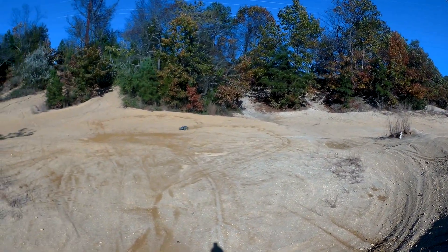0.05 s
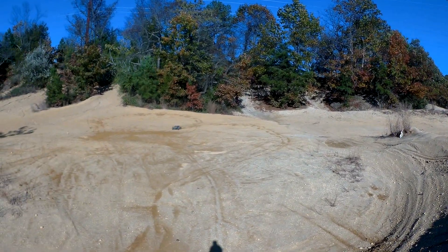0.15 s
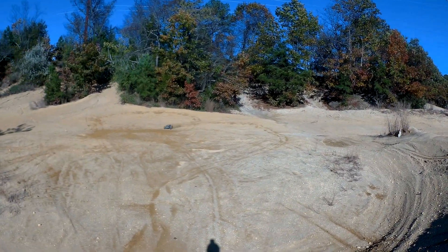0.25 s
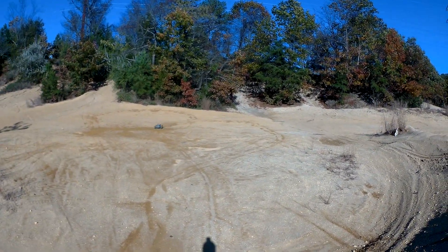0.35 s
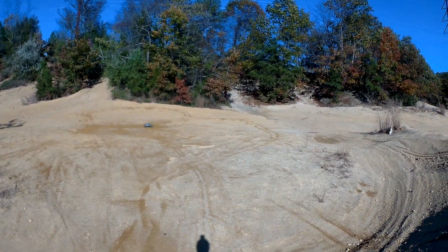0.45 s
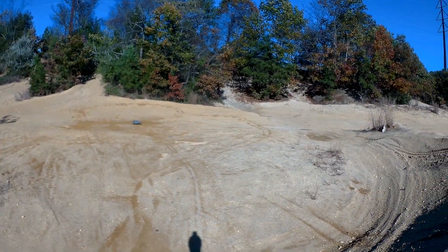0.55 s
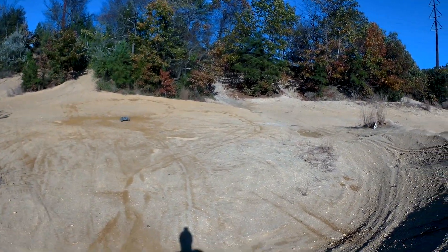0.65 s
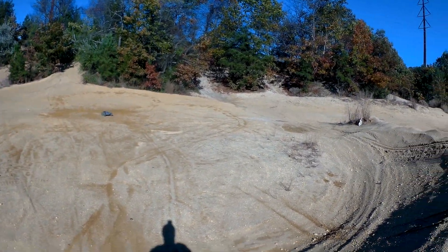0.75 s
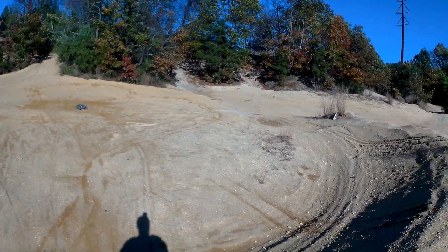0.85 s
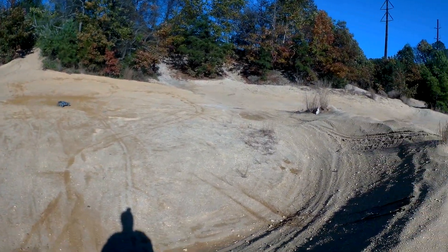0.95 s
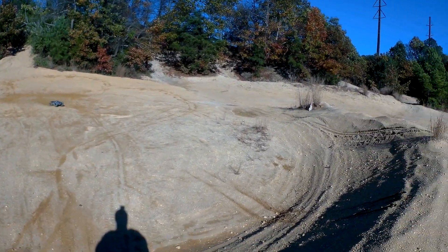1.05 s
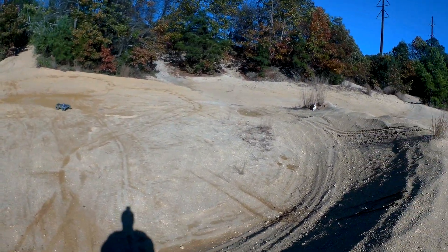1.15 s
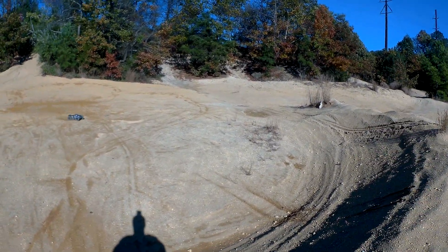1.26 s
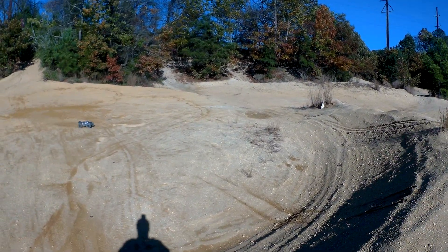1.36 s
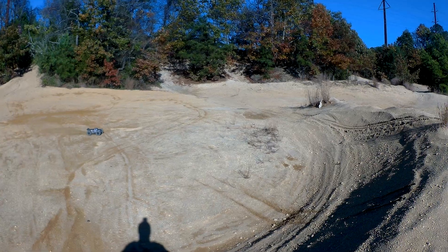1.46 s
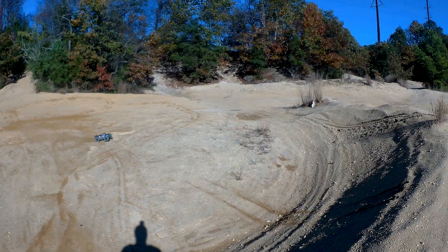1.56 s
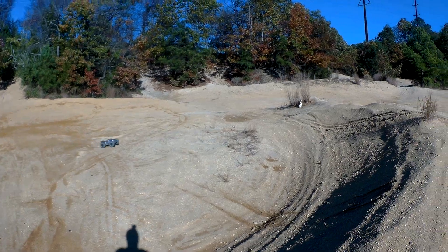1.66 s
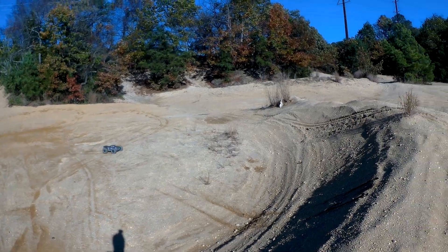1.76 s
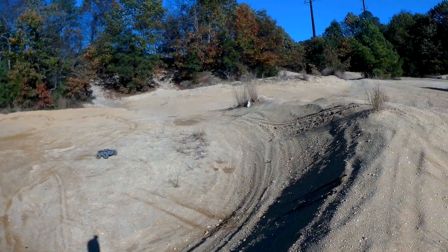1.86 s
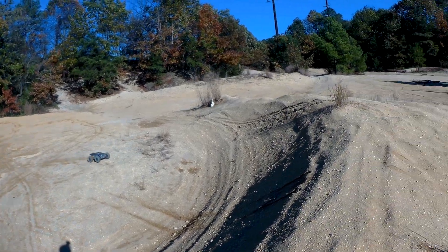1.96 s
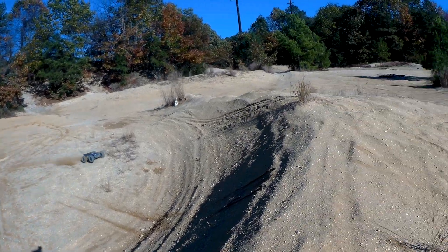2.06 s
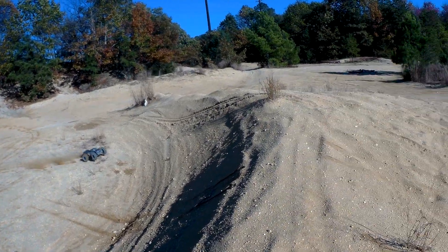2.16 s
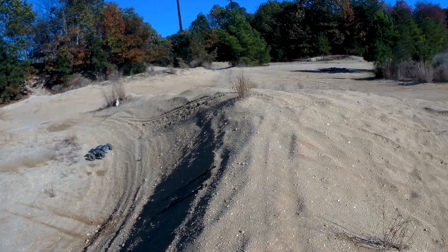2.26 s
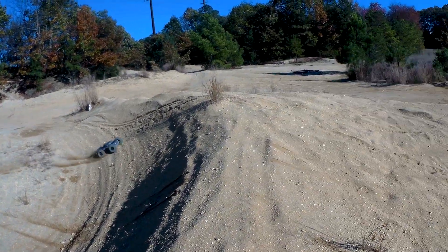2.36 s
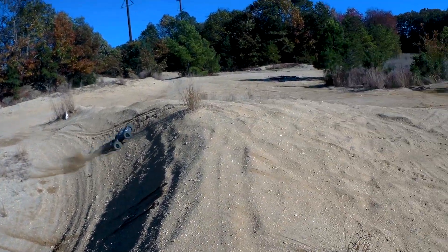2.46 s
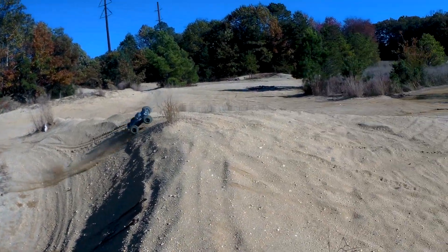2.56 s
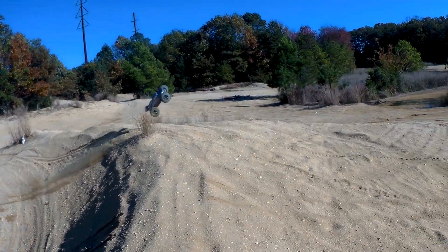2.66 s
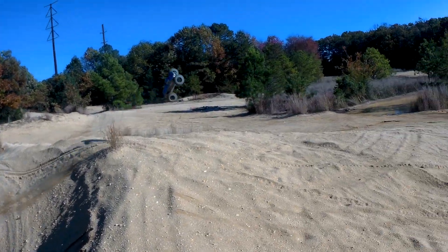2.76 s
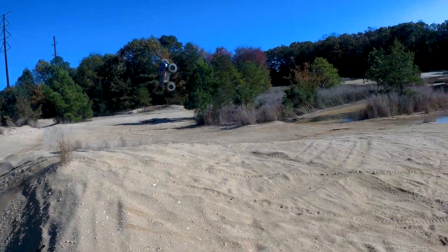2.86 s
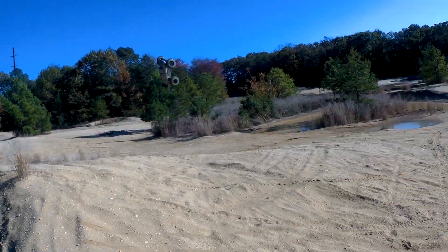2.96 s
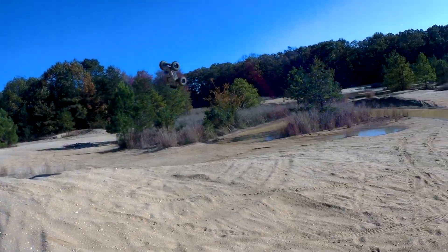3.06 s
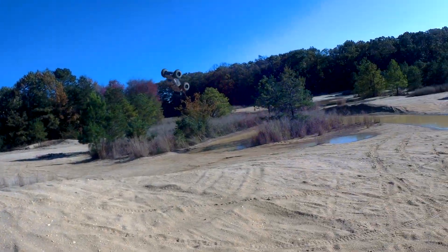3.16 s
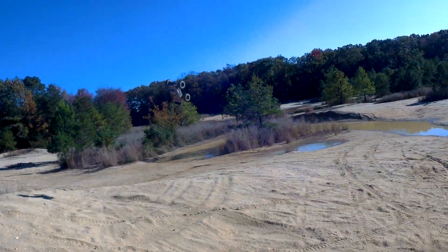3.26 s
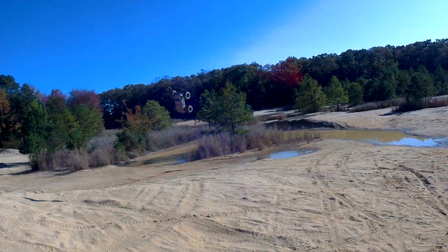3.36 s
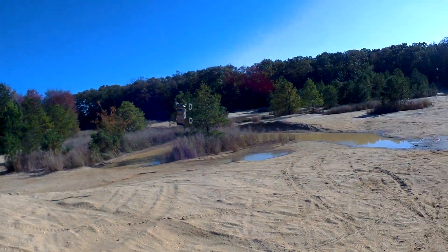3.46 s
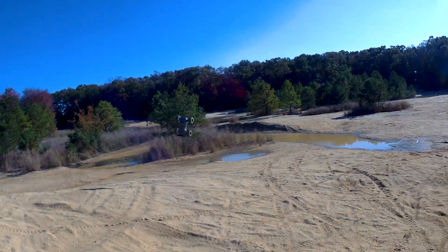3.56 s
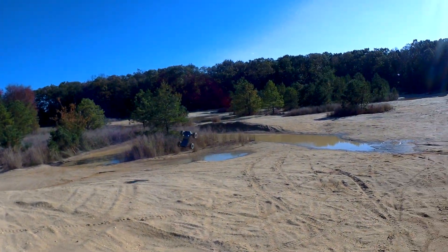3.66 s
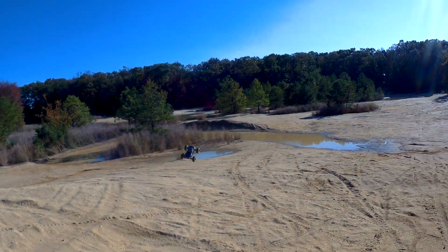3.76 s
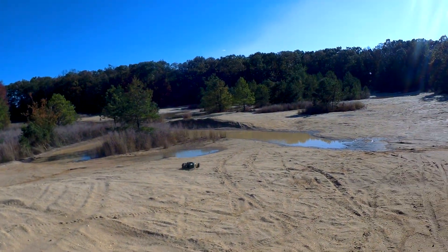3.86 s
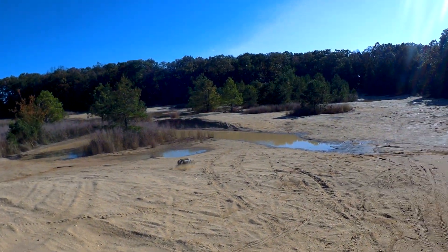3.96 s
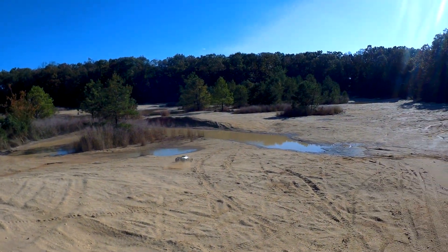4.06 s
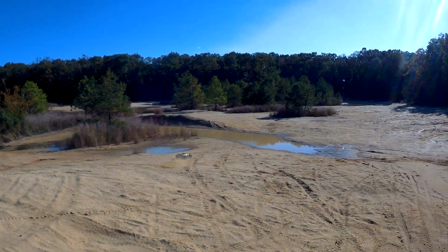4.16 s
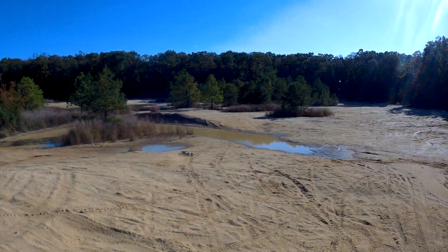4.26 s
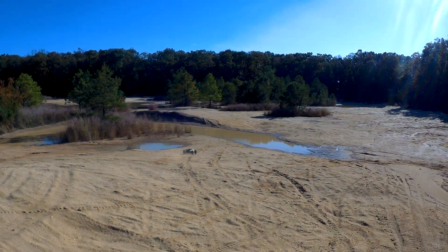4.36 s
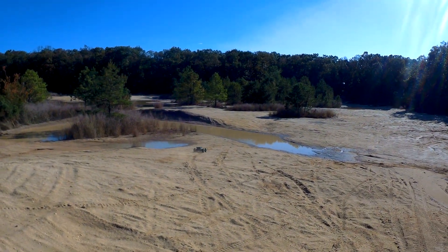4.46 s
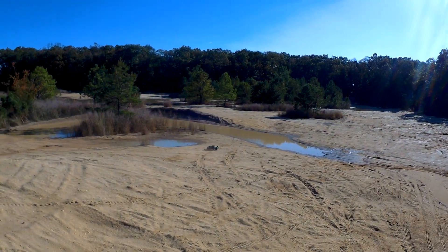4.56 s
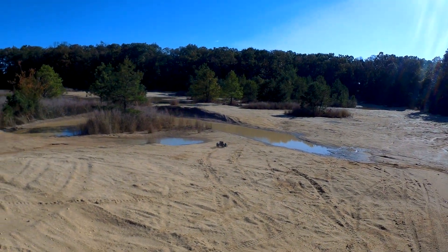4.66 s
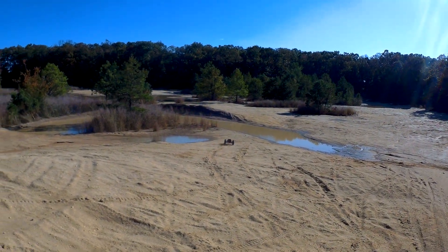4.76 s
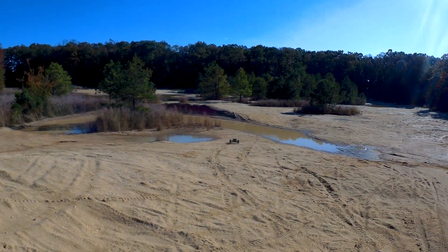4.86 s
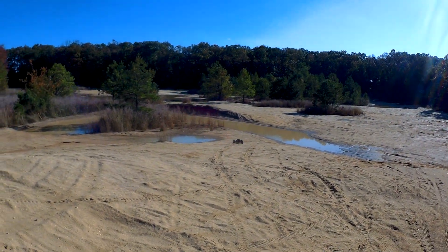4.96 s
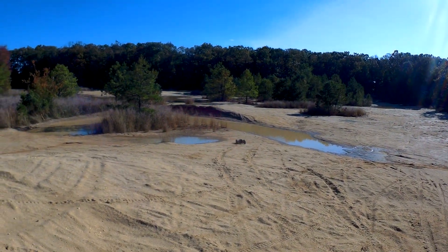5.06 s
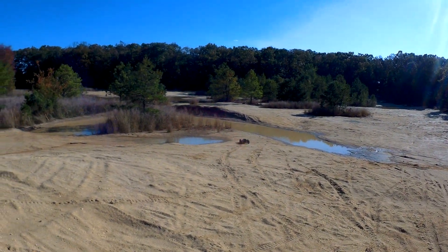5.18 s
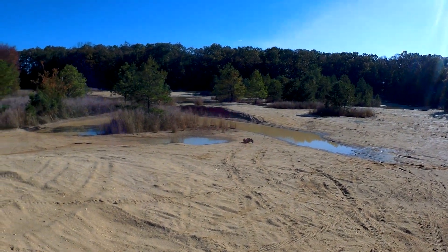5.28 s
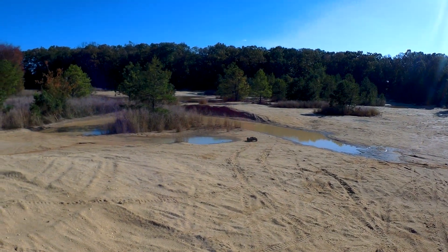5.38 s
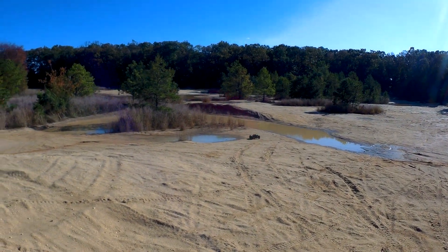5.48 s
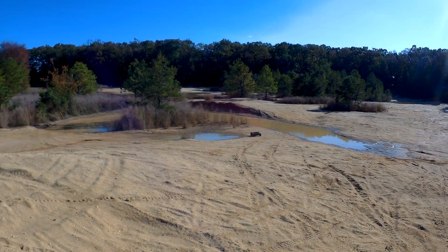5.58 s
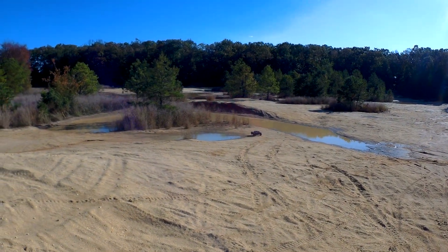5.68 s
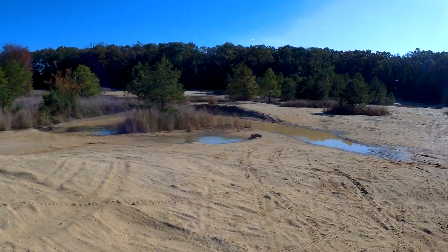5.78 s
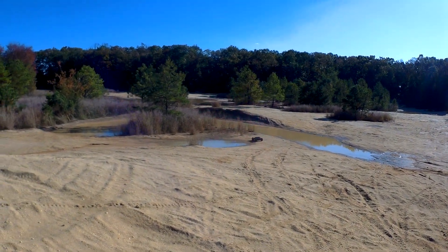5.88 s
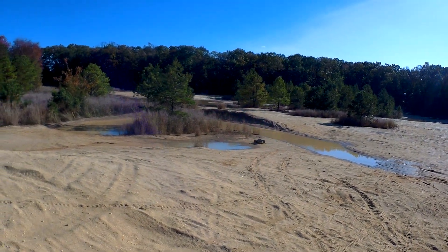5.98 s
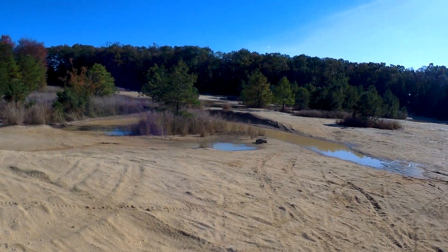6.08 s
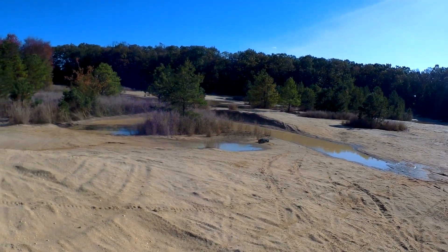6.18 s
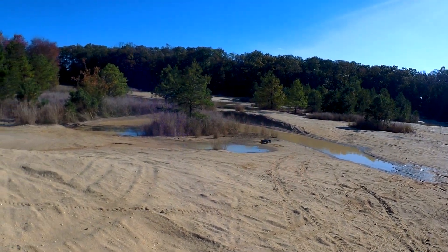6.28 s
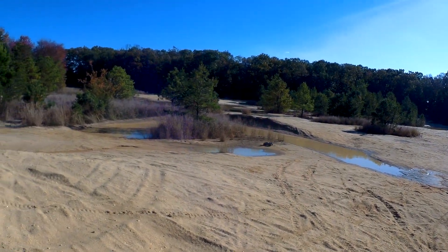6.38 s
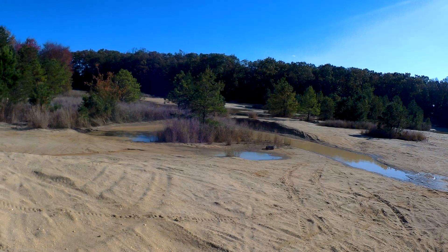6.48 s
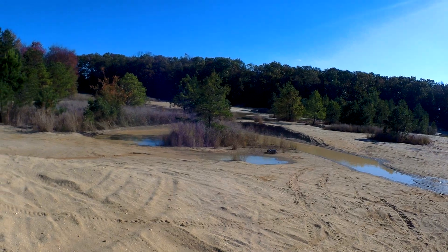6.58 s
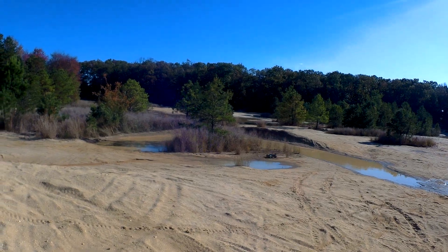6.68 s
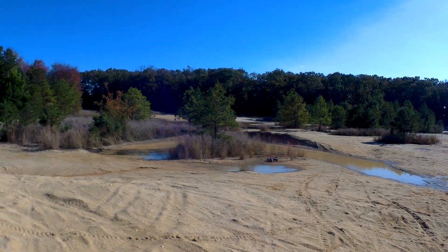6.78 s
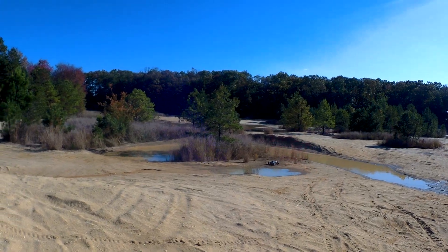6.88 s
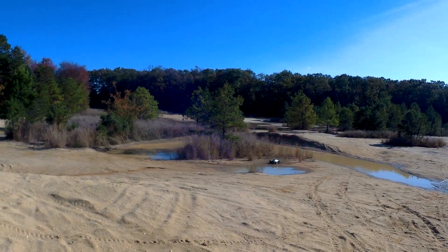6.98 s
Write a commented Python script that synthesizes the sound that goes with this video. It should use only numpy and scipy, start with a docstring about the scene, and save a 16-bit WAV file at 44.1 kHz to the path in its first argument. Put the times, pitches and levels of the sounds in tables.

```python
"""Light wind and steady far air; an electric model truck races over a sand pit toward the microphone.
Geared motor tones whistle, filtered clicks make rasp, shell drone, tyre churn and spray; the wheels howl.
It passes close with a thin sizzle, hits a ramp and flies, its unloaded gears singing out.
Dying modes and a low thump land it; then stabs of throttle bend the gear tones far off.
Two dull bumps of air reach the microphone late; the pit adds a faint echo to the truck."""
import sys
import numpy as np
from scipy import signal
from scipy.fft import rfft, irfft
from scipy.io import wavfile

SR = 44100
rng = np.random.default_rng(int(sys.argv[2]) if len(sys.argv) > 2 else 0)


def inscribe(sig):
    """Save sig as 16-bit PCM at rate SR to the path in sys.argv[1].

    A 1-D sig is mono; a 2-D sig holds one channel per row.
    Samples are clipped to [-1, 1] before scaling.
    """
    pcm = np.round(np.clip(np.atleast_2d(sig).T, -1, 1) * 32767)
    wavfile.write(sys.argv[1], SR, pcm.astype(np.int16))


N = 310010
T = np.arange(N) / SR
# the landing blows come before SETTLED_S, when the driving layers regain their ground balance
PASS_S, TAKEOFF_S, SETTLED_S = 2.15, 2.72, 4.3

# motor speed on the run-up, sagging wherever the sand drags: t/s, mesh rate f/Hz, whistle level/dB
RUN_UP = [(.07, 855, -66), (.24, 1050, -58), (.39, 1030, -52), (.47, 1244, -51), (.56, 1185, -53),
          (.67, 1225, -48.5), (.78, 1276, -49), (.88, 1200, -55), (.94, 1230, -57), (1.0, 1345, -53),
          (1.08, 1350, -53), (1.13, 1335, -56), (1.18, 1375, -53), (1.23, 1402, -52), (1.28, 1360, -58),
          (1.35, 1300, -53), (1.41, 1210, -44), (1.51, 1421, -45.5), (1.59, 1330, -50), (1.68, 1222, -46),
          (1.77, 1446, -53), (1.85, 1400, -51), (1.96, 1435, -47), (2.07, 1390, -53), (2.13, 1500, -54),
          (2.21, 1630, -46), (2.29, 1749, -52), (2.37, 1600, -62), (2.46, 1400, -56), (2.51, 1790, -39),
          (2.56, 2000, -45), (2.61, 1770, -42), (2.68, 2060, -45), (2.8, 1670, -62)]
# wheel howl, rising with road speed and running down in flight; after landing, a weak tone near 1 kHz,
# about half the gear pitch, under the throttle stabs: t/s, pitch f/Hz, level/dB
WHEEL_TONE = [(0, 900, -44), (.3, 960, -37.5), (.6, 930, -43.5), (1.05, 980, -38), (1.35, 1030, -39.5),
              (1.65, 1133, -36), (1.88, 1338, -31.5), (2.07, 1534, -33), (2.28, 1660, -46),
              (2.42, 1500, -46), (2.73, 1850, -44), (2.81, 1740, -35.5), (2.88, 1700, -44),
              (2.94, 1700, -39), (3.0, 1693, -54), (3.2, 1720, -56), (3.28, 1450, -54), (3.41, 1270, -48),
              (3.47, 1210, -44), (3.56, 1175, -43.5), (3.61, 1140, -52), (3.69, 1130, -48),
              (3.95, 900, -52), (4.45, 960, -62), (4.6, 1000, -47), (4.66, 970, -52), (4.76, 1000, -45),
              (4.81, 1160, -47), (4.86, 900, -54), (5.0, 900, -50), (5.07, 1130, -51), (5.2, 1100, -75)]
# nearness of the drive layers, as an equivalent distance (smaller is louder), and how hard the truck is driven
# (each layer scales both): t/s, equivalent distance/m, effort/dB
NEARNESS_AND_EFFORT = [(0, 6, -17), (.12, 8.8, -12.5), (.42, 8.9, -2), (1.1, 12.1, 0.5), (1.4, 9.2, 3),
                       (1.7, 8, -1.5), (1.9, 7, 3), (2.45, 3.55, -2), (2.72, 6.14, 3.5), (3.0, 7, -2.5),
                       (3.5, 7.5, -7), (3.95, 24.4, 3.5), (4.45, 12.8, -12.5), (5.0, 9.7, -15.5),
                       (5.45, 28, -14.5), (5.95, 20.4, -6.5), (6.58, 19, -12), (7.03, 20, -2.5)]
# stabs of throttle: t/s, rise/s, length/s, fade/(dB/s), from f/Hz, to f/Hz, mesh tone level/dB (before a lift),
# second harmonic/dB, third harmonic/dB, gear rasp/dB, shell drone/dB, sand spray/dB
THROTTLE_STABS = [(4.487, .02, 0.1, 15, 1880, 2000, -45, -70, -72, -48, -52, -70),
                  (4.61, 0.032, .05, 12, 2150, 1820, -45, -68, -72, -42, -46, -65),
                  (4.68, 0.016, .16, 22, 1950, 2040, -43.5, -66, -70, -45, -46, -63),
                  (5.098, 0.015, .012, 30, 2330, 2290, -47, -75, -76, -60, -61, -75),
                  (5.345, .006, .012, 160, 1900, 2100, -45, -70, -76, -42.5, -52, -70),
                  (5.683, .016, .1, 55, 1350, 2450, -39, -57, -58, -37, -42, -57),
                  (5.81, 0.014, .1, 70, 2050, 2420, -45, -63, -70, -42, -38.5, -64),
                  (6.12, .017, .125, 58, 1600, 2270, -37, -55.5, -56, -37.5, -43, -56),
                  (6.655, 0.035, 0.13, 28, 1289, 1221, -36, -60, -74, -45, -39, -77),
                  (6.93, 0.039, .11, 8, 1293, 1740, -37.5, -59, -68, -40, -38.5, -63)]


def amp(db):
    """Amplitude factor of a level in dB."""
    return 10 ** (np.asarray(db) / 20)


def unit(x):
    """Scales x to unit power."""
    return x / np.sqrt(np.mean(x ** 2) + 1e-20)


def ramp(start, length):
    """Rises from 0 to 1 and stays there."""
    return np.clip((T - start) / max(length, 1e-3), 0, 1)


def swell(middle, length):
    """A smooth rise and fall that is silent outside its length."""
    return np.cos(np.pi * np.clip((T - middle) / length, -.5, .5)) ** 2


def blend(a, b, share):
    """Mixes two sounds at constant power; b takes the given share."""
    return np.sqrt(1 - share) * a + np.sqrt(share) * b


def follow(rows):
    """Each column of a curve table at every sample."""
    s, *columns = np.transpose(rows)
    return [np.interp(T, s, c) for c in columns]


def colour(x, points):
    """Filters x by a spectrum and brings it to unit power."""
    hz, db = np.transpose(points)
    bins_hz = np.fft.rfftfreq(len(x), 1 / SR)
    gain = amp(np.interp(np.log(bins_hz + 1), np.log(hz), db))
    return unit(irfft(rfft(x) * gain, len(x)))


def wander(rate):
    """Smooth chance of unit size that changes about rate times a second."""
    hz = np.fft.rfftfreq(N, 1 / SR)
    return unit(irfft(rfft(rng.standard_normal(N)) / (1 + (hz / rate) ** 2), N))


def grains(per_s, spread_db):
    """Sparse clicks of uneven size."""
    size = amp(spread_db * np.minimum(rng.exponential(1, N), 4)) * rng.choice([-1, 1], N)
    return unit(size * (rng.random(N) < per_s / SR))


def resonate(x, hz, width):
    """A steep resonance: the same pole pair twice."""
    b, a = signal.iirpeak(hz, hz / width, SR)
    return signal.lfilter(b, a, signal.lfilter(b, a, x))


def stab(start, rise, length, fade_db_per_s):
    """Envelope of a stab of throttle: attack, sagging hold, release."""
    hold = amp(-abs(fade_db_per_s) * np.clip(T - start, 0, 1))
    release = np.exp(-np.clip(T - start - length, 0, 1) / .028)  # time constant in s
    return ramp(start, rise) * hold * release


def mesh_phase(hz, jitter):
    """Bumps and tooth play make the gear speed shiver."""
    return 2 * np.pi * np.cumsum(hz * (1 + jitter * wander(114.3))) / SR


def tooth_force(phase, runout, rough):
    """The tooth load swings once per pinion turn and chatters at random."""
    pinion_teeth = 13
    return unit(1 + runout * np.cos(phase / pinion_teeth) + rough * wander(160))


def gear_chatter(hz):
    """Loose gears strike once per shaft turn: a wavering stack of partials that glides with their speed."""
    shaft = mesh_phase(hz * (1 + .004 * wander(20)), jitter=.008) / 6
    stack = np.zeros(N)
    for k in range(4, 22):
        partial = np.cos(k * shaft + 2 * np.pi * rng.random())
        stack += partial * (1 + .8 * wander(18)) / (1 + k % 2)  # odd partials at half size
    return unit(stack)


def nearness_db():
    """Level that follows the apparent nearness; 0 dB at an equivalent distance of 4.5 m."""
    return -20 * np.log10(np.maximum(follow(NEARNESS_AND_EFFORT)[0], 1) / 4.5)


def outdoors():
    """Distant steady air, and light gusts lumping on the microphone."""
    # spectrum of the far air: f/Hz, density/dB
    air_colour = [(15, -40), (25, -17), (79, -8.5), (178, -12), (227, 1), (297, -1.5), (509, 0),
                  (567, -3.5), (970, -0.5), (1850, -6.5), (2230, -8.5), (2850, -14.5), (3930, -21),
                  (13200, -27), (15500, -32)]
    # wind on the microphone: t/s, level/dB
    gust_levels = [(0, -53), (.4, -58), (.6, -48.5), (1.1, -57), (1.8, -54), (2.3, -73), (3.8, -64.5),
                   (4.25, -53), (5.2, -63.5), (5.9, -60.5), (6.4, -59), (7, -56)]
    air = amp(-50 + .5 * wander(3.6)) * colour(rng.standard_normal(N), air_colour)
    gust_colour = [(20, -8.5), (70, -0.5), (150, -4), (400, -6.5), (2000, -57)]
    gusts = colour(rng.standard_normal(N), gust_colour)
    return air + amp(follow(gust_levels)[0] + 2 * wander(2.6)) * gusts


def drive_levels():
    """Powers add: steady driving by nearness and effort, then rough sand and throttle; returns amplitudes."""
    # stretches of rough sand that shake the truck:
    # middle t/s, length/s, shell drone level/dB, tyre churn level/dB, sand spray level/dB
    hummocks = [(0.375, 0.3, -28.5, -54, -59), (0.983, 0.39, -26.5, -46, -66),
                (1.34, 0.46, -46, -38.5, -73), (1.48, 0.15, -41, -54, -53), (1.605, 0.23, -31, -37, -70),
                (1.87, 0.42, -43, -36, -57), (2.13, 0.39, -21.5, -37.5, -48.5),
                (2.44, 0.13, -21.5, -27, -47), (2.6, 0.24, -27, -29.5, -47), (4.205, 0.084, -56, -47, -59),
                (4.377, 0.16, -44, -63, -59), (6.32, 0.12, -44, -49, -61), (6.46, 0.15, -44, -55.5, -65)]
    # the drivetrain shakes with each change of throttle in the air:
    # t/s, rise/s, length/s, fade/(dB/s), gear rasp level/dB, shell drone level/dB, sand spray level/dB
    surges = [(2.81, .047, .1, 20, -41, -52, -58), (3.08, .036, .11, 11, -42, -56, -54),
              (3.19, .035, .16, 70, -31, -28, -42)]
    near_db, effort_db = nearness_db(), follow(NEARNESS_AND_EFFORT)[1]
    airborne = ramp(TAKEOFF_S - .02, 0.026) - ramp(SETTLED_S, 0.015)
    # sand is thrown backward, so it is shaded while the truck approaches
    facing = 1 - ramp(PASS_S - .05, 0.24)
    churn = amp(-39 + 0.72 * near_db + 0.59 * effort_db - 2.1 * airborne) ** 2
    shell = amp(-32.0 + 0.36 * near_db + 2.0 * effort_db - 35 * airborne) ** 2
    rasp = amp(-28.5 + 1.26 * near_db + 0.94 * effort_db) ** 2
    shade_db = 8.3 * facing + 2.1 * airborne * ramp(4.0, 0.54)
    spray = amp(-43.5 + 1.06 * near_db + 1.13 * effort_db - shade_db) ** 2
    for middle, length, shell_db, churn_db, spray_db in hummocks:
        shake = swell(middle, length)
        shell += amp(shell_db) ** 2 * shake
        churn += amp(churn_db) ** 2 * shake
        spray += amp(spray_db) ** 2 * shake
    for start, rise, length, fade, *_, rasp_db, shell_db, spray_db in THROTTLE_STABS + surges:
        push = stab(start, rise, length, fade) ** 2
        rasp += amp(rasp_db) ** 2 * push
        shell += amp(shell_db) ** 2 * push
        spray += amp(spray_db) ** 2 * push
    return np.sqrt([churn, shell, rasp, spray])


def tyre_churn(level, bumps):
    """Tread slaps are coloured clicks; under them the tyres boom hollowly, strongest when the truck sounds near."""
    # spectrum of the tread slaps: f/Hz, density/dB
    churn_colour = [(60, -62), (140, -20), (250, -14), (400, -2), (550, 2.5), (750, 1.5), (1000, 4),
                    (1500, -32.5)]
    # spectrum of the hollow boom: f/Hz, density/dB
    boom_colour = [(70, -47), (160, -2), (240, 4.5), (340, 7), (450, -23), (800, -54)]
    slaps = amp(1.0 + 2.57 * bumps) * colour(grains(1500, spread_db=3.0), churn_colour)
    boom = amp(-11.0 + 1.8 * nearness_db()) * colour(grains(900, spread_db=2.0), boom_colour)
    return level * (slaps + boom)


def shell_drone(level, bumps, axle):
    """Shaking excites the plastic shell's resonances, bent by flexing; clatter and gear hum join in."""
    # shell resonances: f/Hz, width of one filter pass/Hz, level/dB
    shell_modes = [(952, 103, -1.5), (1188, 57, -8.5)]
    # spectrum of the shell's clatter: f/Hz, density/dB
    clatter_colour = [(100, -25), (650, -12), (880, -0.5), (1050, 3), (1250, -0.5), (1550, -15),
                      (5000, -37), (9000, -57)]
    shaking = grains(2500, spread_db=-4.5)
    drone = unit(sum(amp(db) * resonate(shaking, hz, width) for hz, width, db in shell_modes))
    flex_hz = 20 * wander(6)
    flex = np.exp(2j * np.pi * np.cumsum(flex_hz) / SR)
    drone = (signal.hilbert(drone) * flex).real
    racing = 1 - ramp(SETTLED_S, .02)  # the gears ring through the shell until the truck has landed
    rattle = colour(shaking[::-1], clatter_colour)
    clatter = blend(rattle, colour(axle, clatter_colour), .35 * racing)
    loose = np.clip((T - 1.1) / .5, 0, .75)  # from 1.1 s the drone breaks up into clatter
    return level * amp(-5.5 + 0.2 * bumps) * blend(drone, clatter, loose)


def gear_rasp(level, bumps, axle):
    """A rattling drivetrain: dense clicks blended with gear chatter, recoloured through the flight."""
    # rasp on the ground near by: f/Hz, density/dB
    near_colour = [(700, -28), (1150, 10.5), (1550, 0.5), (1800, 6.5), (2200, 4), (2500, -1.5), (3000, -1),
                   (3400, -1.5), (3780, -12), (4400, -7), (5600, -14), (8000, -85)]
    # rasp off the ground: f/Hz, density/dB
    flight_colour = [(500, -16), (800, -4.5), (1200, -2.5), (1400, -1.5), (1750, 0), (2250, -4.5),
                     (2700, -10), (3300, -8.5), (3850, -17.5), (4400, -12.5), (5600, -21.5), (8000, -56)]
    # rasp from far away: f/Hz, density/dB
    far_colour = [(700, -14.5), (1250, 5), (1550, 0), (1900, -1.5), (2350, -2), (2900, -13), (3700, -25.5),
                  (4600, -33), (5600, -22.5), (8000, -34)]
    chatter_share = .45
    gears = axle + (1 - ramp(TAKEOFF_S, .05)) * gear_chatter(follow(RUN_UP)[0])
    near = blend(colour(grains(3500, spread_db=2.0), near_colour), 0.59 * colour(gears, near_colour), chatter_share)
    flight_clicks = colour(grains(3500, spread_db=1.5), flight_colour)
    flight = blend(flight_clicks, colour(axle, flight_colour), chatter_share)
    far = colour(grains(2500, spread_db=2), far_colour)
    # the rasp thins off the ground and dulls as the truck flies away
    lifted, dull = ramp(TAKEOFF_S - .05, 0.045), ramp(3.03, 0.95)
    close = blend(near, flight, lifted)
    return level * amp(-0.36 + 1.88 * bumps) * blend(close, far, dull)


def sand_spray(level):
    """Thrown sand: very dense bright clicks in uneven bursts."""
    # spectrum of the spray: f/Hz, density/dB
    spray_colour = [(2500, -10.5), (4400, 11.5), (5900, 3), (6900, 9.5), (7800, -2), (8700, 5),
                    (9600, -1.5), (10800, -17.5), (12400, -3), (14000, -15), (16000, -3)]
    return level * amp(0.5 + 2.5 * wander(11)) * colour(grains(20000, spread_db=4.0), spray_colour)


def drive():
    """The same bumps shake tread, shell and drivetrain; thrown sand varies on its own."""
    churn_level, shell_level, rasp_level, spray_level = drive_levels()
    bumps = wander(8.7)
    axle = gear_chatter(follow(WHEEL_TONE)[0])
    ground = tyre_churn(churn_level, bumps) + sand_spray(spray_level)
    return ground + shell_drone(shell_level, bumps, axle) + gear_rasp(rasp_level, bumps, axle)


def wheel_howl():
    """Tread lugs beat unevenly on sand, a fuzzy tone over a weak lower partial; a cleaner one joins at take-off."""
    hz, db = follow(WHEEL_TONE)
    phase = 2 * np.pi * np.cumsum(hz) / SR
    b, a = signal.butter(2, 85, fs=SR)  # width of the fuzz in Hz
    p, q = signal.lfilter(b, a, rng.standard_normal((2, N)))
    rolling = unit(p * np.cos(phase) + q * np.sin(phase))
    spinning = unit((1 + .45 * wander(24)) * np.sin(phase + .6 * wander(24)))
    clean = .6 * ramp(TAKEOFF_S, .03) - .1 * ramp(SETTLED_S, .03)
    low = wander(30) * np.sin(phase / 3)
    return amp(db) * (blend(rolling, spinning, clean) + amp(-19.5) * low)


def tread_fizz():
    """Fine sand fizzes under the tread on the run-up, fading steeply with apparent nearness."""
    # spectrum of the fizz: f/Hz, density/dB
    fizz_colour = [(3000, 3.5), (6500, 1), (8700, 5), (9900, -2), (10800, -22), (12400, -7)]
    db = -47.5 + 1.97 * nearness_db() + 0.21 * follow(NEARNESS_AND_EFFORT)[1] + 1.3 * wander(20)
    grounded = 1 - ramp(TAKEOFF_S - .02, .05)
    return amp(db) * grounded * colour(grains(20000, spread_db=1.5), fizz_colour)


def motor():
    """A rough whistle at four times the mesh rate, its octave and a weak mesh tone, shaped by the motor can."""
    can_low_hz, can_high_hz = 4020, 9700  # the range in which the can rings
    hz, whistle_db = follow(RUN_UP)
    # it shivers more on the rough foot of the ramp
    phase = mesh_phase(hz * (1 + .007 * wander(16)), jitter=.011 + .005 * ramp(PASS_S - .15, .1))
    flutter = unit(amp(2 * wander(20)))
    mesh = amp(whistle_db - 6) * tooth_force(phase, runout=0.89, rough=0.75) * np.sin(phase)
    # the whistle weakens below the can's range, the octave above it
    above = 1 / (1 + (can_low_hz / (4 * hz)) ** 16)
    below = 1 / (1 + (8 * hz / can_high_hz) ** 24)
    whistle = amp(whistle_db) * above * flutter * tooth_force(phase, runout=.7, rough=.8) * np.sin(4 * phase)
    octave = amp(-60.5) * below * flutter * tooth_force(phase, runout=2, rough=2) * np.sin(8 * phase)
    grounded = 1 - ramp(TAKEOFF_S - .02, 0.04)
    return np.sqrt(2) * grounded * (mesh + whistle + octave)  # root 2 makes the levels RMS


def ring(modes, t, detune):
    """Dying modes; each blow lands on another spot and bends them a little."""
    hz, db, t60 = np.transpose(modes)[:, :, None]
    hz = hz * (1 + detune * rng.uniform(-1.26, 1, hz.shape))
    sign = rng.choice([-1, 1], hz.shape)
    wave = (sign * amp(db - 60 * t / t60) * np.sin(2 * np.pi * hz * t)).sum(0)
    return wave / abs(wave).max()


def knocks():
    """Each blow rings the chassis, swells through the soft tyres and cracks grit against the plastic."""
    # blows: t/s, chassis ring level/dB, tyre thud level/dB (before a 5 dB lift), crack level/dB (before an 11 dB cut)
    blows = [(0.07, -31, -37, -50), (1.034, -24, -59, -42), (1.297, -29, -20.5, -48),
             (2.221, -12, -42, -40), (2.423, -14, -16.5, -41), (2.437, -7, -36, -35), (2.445, -10, -20, -9),
             (2.495, -8.5, -34, -28), (2.574, -17, -19, -21), (2.621, -19, -28, -45),
             (3.9443, -18.5, -20, -40), (3.948, -21, -24, -42), (3.957, -17, -25, -40),
             (3.965, -18, -27, -19), (3.98, -8.5, -14, -18), (3.9855, -15, -11.5, -18),
             (3.997, -13, -25, -22), (4.017, -25, -36, -39), (4.043, -50, -60, -36), (4.326, -56, -64, -30),
             (4.399, -35, -60, -23.5), (5.695, -23, -57, -53), (6.13, -27, -58, -36),
             (6.678, -23, -45, -58)]
    # chassis modes: f/Hz, level/dB, t60/s
    chassis_modes = [(850, -5, 0.051), (983, 0.5, 0.066), (1145, 10, 0.015), (1369, -5.5, 0.093),
                     (1693, -4.5, 0.031), (2153, -2.5, 0.022), (4720, -15, 0.012)]
    # tyres and suspension bottoming out: f/Hz, level/dB, t60/s
    tyre_modes = [(159.5, -8.5, 0.089), (272, -10, 0.06), (358, 2.5, 0.04), (450, 7, 0.05), (540, 0, 0.045),
                  (687, 16.5, 0.012)]
    grit_colour = [(500, 8.0), (2000, 16.0), (4500, 3.5), (8000, -2), (13000, -33)]
    out, t = np.zeros(N), np.arange(SR // 5) / SR
    for s, ring_db, thud_db, crack_db in blows:
        grit = colour(rng.standard_normal(len(t)), grit_colour)
        crack = amp(crack_db - 11.0 - 60 * t / 0.037) * grit
        chassis = amp(ring_db) * ring(chassis_modes, t, detune=.05) * (1 - np.exp(-t / .0007))
        thud = amp(thud_db + 5.0) * ring(tyre_modes, t, detune=.035) * (1 - np.exp(-t / .0026))
        part = out[round(s * SR):][:len(t)]
        part += (chassis + thud + crack)[:len(part)]
    return out


def pass_sizzle():
    """A thin, very high band of noise that is heard only as the truck comes right past."""
    peak_s, peak_db, rise_db_per_s, fall_db_per_s = 2.21, -50, 34, 90
    db = peak_db - np.maximum(rise_db_per_s * (peak_s - T), fall_db_per_s * (T - peak_s))
    sizzle_colour = [(10800, -50), (11800, -1), (12400, 0), (13100, -9), (14200, -22), (16000, -30)]
    return amp(db + 1.3 * wander(20)) * colour(rng.standard_normal(N), sizzle_colour)


def free_motor():
    """Off the ground the gears sing out, fluttering: the mesh tone and its octave."""
    # the unloaded motor, revving and then braking: t/s, mesh rate f/Hz, mesh tone level/dB, octave level/dB
    flight_tones = [(2.7, 1560, -55, -50), (2.75, 1580, -50, -43), (2.81, 1670, -48, -52),
                    (2.86, 1760, -46, -36), (2.91, 1825, -40, -34), (2.96, 1830, -48, -53),
                    (3.05, 1730, -50, -60), (3.12, 1780, -35.5, -47), (3.19, 1725, -35.5, -47),
                    (3.225, 1660, -31, -40.5), (3.265, 1490, -37, -42.5), (3.35, 1370, -43, -62),
                    (3.42, 1270, -60, -75)]
    hz, tone_db, octave_db = follow(flight_tones)
    phase = mesh_phase(hz * (1 + .004 * wander(20)), jitter=.006)
    tones = amp(tone_db) * np.sin(phase) + amp(octave_db) * np.sin(2 * phase)
    aloft = ramp(flight_tones[0][0], .02) - ramp(flight_tones[-1][0], .02)
    flutter = unit(amp(1.2 * wander(18)))
    return aloft * tones * flutter * tooth_force(phase, runout=.5, rough=.4)


def landing_thump():
    """The whole truck pushes into the sand as it lands: a short swell of a low sine."""
    at_s, hz, db, length_s = 3.975, 83, -36, 0.037
    return amp(db) * swell(at_s, length_s) * np.sin(2 * np.pi * hz * (T - at_s))


def blips():
    """Stabs of throttle pull the gears exponentially toward a new speed; tones are harmonics of the mesh."""
    hz, levels = np.full(N, float(THROTTLE_STABS[0][4])), np.zeros((3, N))
    for start, rise, length, fade, from_hz, to_hz, *db in THROTTLE_STABS:
        after = T >= start
        spin_up_s = .36 * length
        hz[after] = to_hz + (from_hz - to_hz) * np.exp(-(T[after] - start) / spin_up_s)
        loaded = stab(start, rise, length, fade)
        # the overtones come in only as the gears get up to speed
        spun_up = stab(start, min(.08, length), length, 0)
        levels += amp(db[:3])[:, None] * np.array([loaded, spun_up, spun_up])
    # the tyres grip and slip, tugging at the speed
    phase = mesh_phase(hz * (1 + .014 * wander(24)), jitter=.012)
    teeth = np.sin(phase) + amp(-12) * np.sin(phase / 2)
    mesh = amp(2.5) * levels[0] * teeth * tooth_force(phase, runout=.55, rough=.55)
    overtones = levels[1] * np.sin(2 * phase) + levels[2] * np.sin(3 * phase)
    return mesh + overtones * tooth_force(phase, runout=.9, rough=1.2)


def mic_bumps():
    """Short dull bumps of air on the microphone: low noise with a quick attack."""
    # soft low bumps: t/s, level/dB, decay time constant/s
    bump_list = [(6.387, -42, .022), (6.55, -50, .02)]
    envelope = np.zeros(N)
    for s, db, decay in bump_list:
        envelope += amp(db) * ramp(s, .004) * np.exp(-np.maximum(T - s, 0) / decay)
    bump_colour = [(30, -6), (80, -6), (170, 0), (260, -6), (500, -30), (2000, -70)]
    return envelope * colour(rng.standard_normal(N), bump_colour)


def sand_banks(x):
    """The banks of the pit scatter a faint, short, dull echo."""
    t = np.arange(SR // 2) / SR
    taps = rng.standard_normal(len(t)) * (rng.random(len(t)) < 2000 / SR) * (t > .008)
    echo_colour = [(150, 2), (1000, 2.5), (3000, -5.0), (10000, -8.5)]
    tail = colour(taps * amp(-60 * t / 0.31), echo_colour) / np.sqrt(len(t))
    return x + amp(-21.5) * signal.fftconvolve(x, tail)[:N]


def scene():
    """The truck echoes in the pit; wind and microphone bumps stay dry."""
    run_up = drive() + wheel_howl() + tread_fizz() + motor() + knocks() + pass_sizzle()
    truck = run_up + free_motor() + landing_thump() + blips()
    return (sand_banks(truck) + outdoors() + mic_bumps())[None]


def record(dry):
    """The recorder's band limit, a steep low-pass at 15.9 kHz."""
    low_pass = signal.firwin(511, 15900, window=("kaiser", 9), fs=SR)
    return signal.oaconvolve(dry, low_pass[None], "same")


dry = scene()
out = record(dry)
inscribe(out)
```